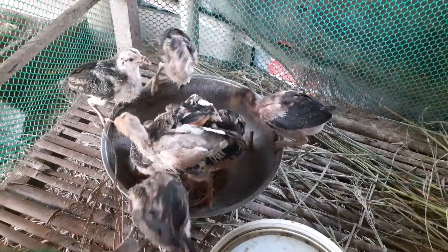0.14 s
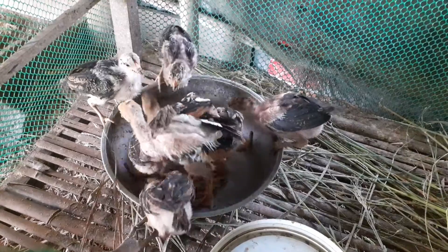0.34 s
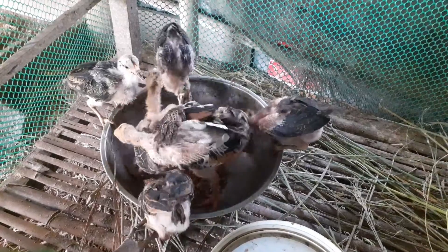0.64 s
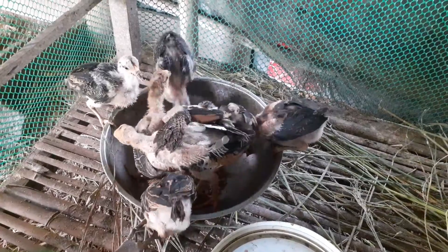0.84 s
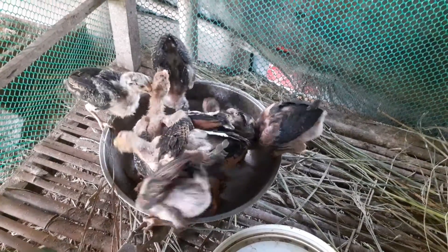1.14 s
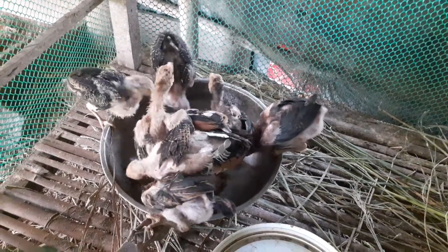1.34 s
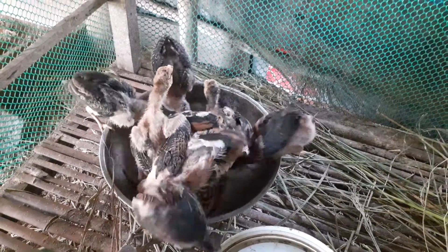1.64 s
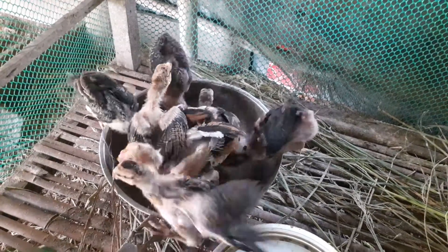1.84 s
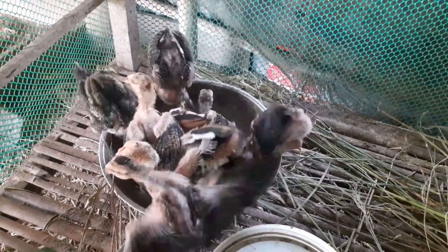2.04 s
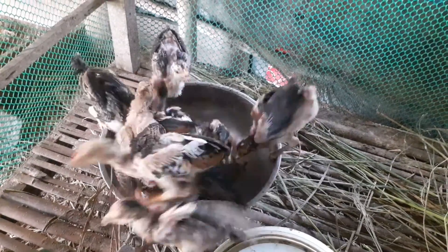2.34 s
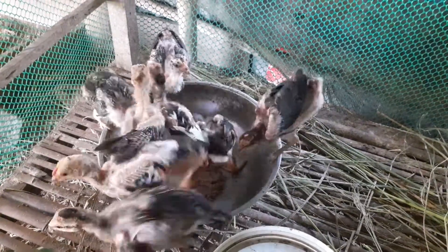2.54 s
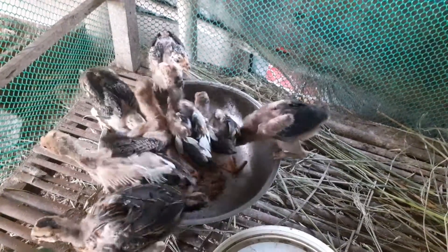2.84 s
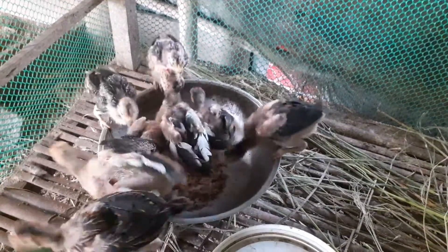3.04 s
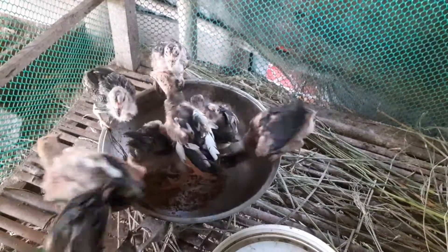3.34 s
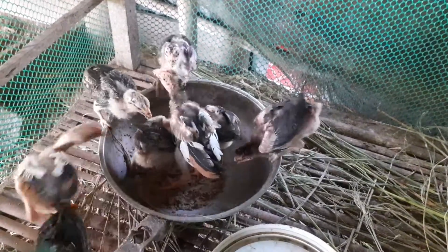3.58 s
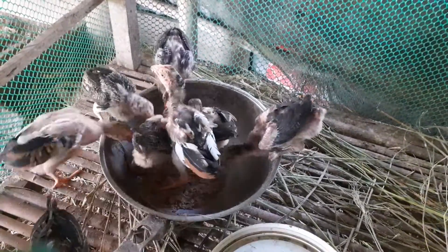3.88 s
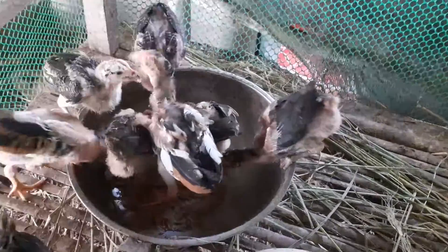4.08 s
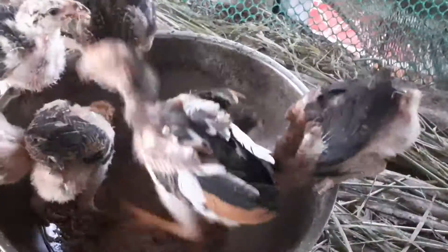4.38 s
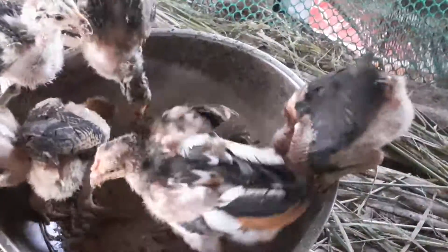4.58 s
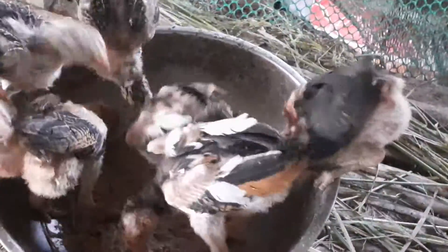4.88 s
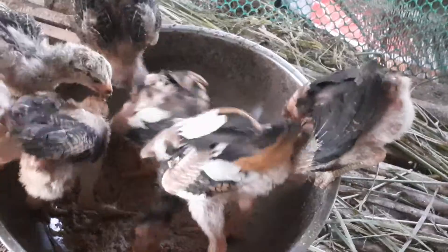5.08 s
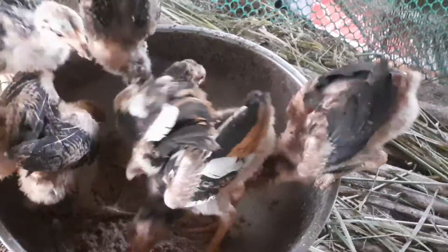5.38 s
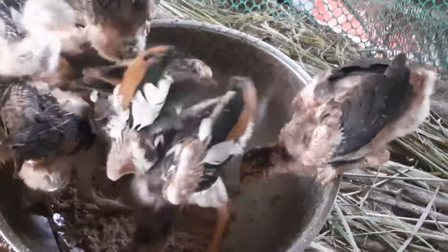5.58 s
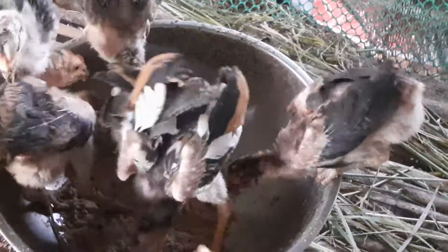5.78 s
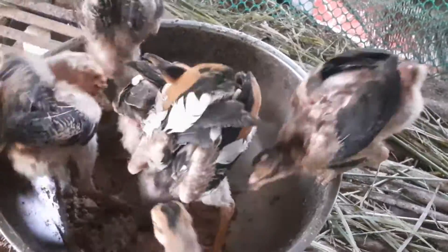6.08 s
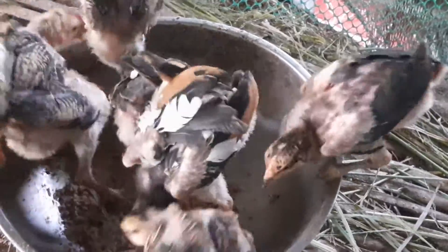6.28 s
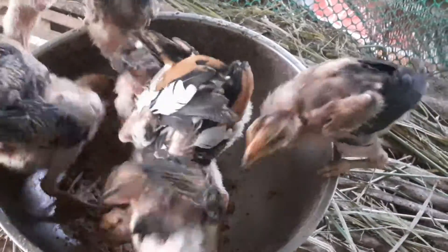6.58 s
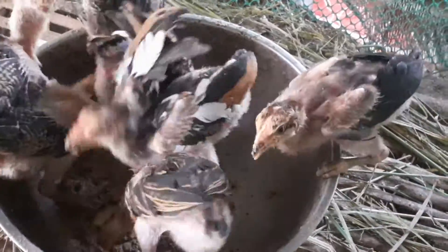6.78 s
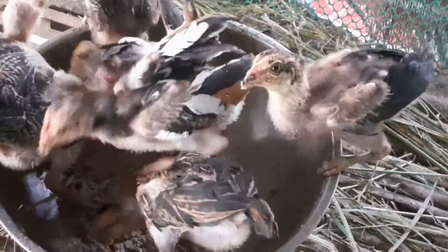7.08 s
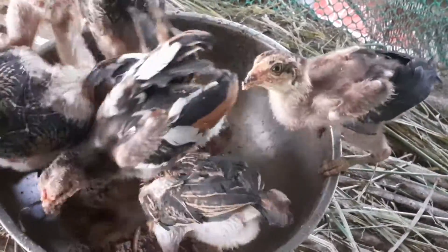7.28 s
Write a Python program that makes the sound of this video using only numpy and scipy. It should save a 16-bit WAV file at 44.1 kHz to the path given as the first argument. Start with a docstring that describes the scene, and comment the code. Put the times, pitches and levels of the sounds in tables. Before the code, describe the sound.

Young chickens feed from a metal bowl close to the microphone, in a coop with a slight, short reverberation. A clear falling peep opens, followed by softer peeps and scattered beak taps, each with a brief metallic ring. From about 2 seconds the pecks come quickly, mixed with dull thumps of feet on the bowl, shuffling, feather and straw rustle and more high peeps. The strongest thump lands at 3 seconds and the sharpest peck at about 3.4, with short claw scrapes around it. From 4 to 6 seconds the taps, knocks, light scratches and peeps continue at a looser pace. Another flurry of pecking, rustling and peeping runs from about 6.2 to 7 seconds, then settles by 7.4. Faint cheeps from other chicks and a quiet, wavering low hum continue throughout.

```python
"""Chicks at a metal feed bowl

Half-grown chicks crowd a bowl close to a two-port microphone. Beak strikes and scattered feed
ring its modes, feet thump its belly, claws scrape its wall. Peeps, near and far, are sliding
sines; feathers, straw and shuffling are patchy noise. A low hum wavers underneath, and the
coop adds a short reverberation."""
import sys
import numpy as np
from scipy import signal
from scipy.fft import rfft, irfft, next_fast_len
from scipy.io import wavfile
from scipy.ndimage import uniform_filter1d, map_coordinates

SR = 44100
rng = np.random.default_rng(int(sys.argv[2]) if len(sys.argv) > 2 else 0)


def generate_wav(signal):
    """Clip the signal to [-1, 1] and save it as 16-bit WAV at the path in sys.argv[1]."""
    frames = np.transpose(np.atleast_2d(signal))
    scaled = np.clip(frames, -1, 1) * 32767
    pcm = np.round(scaled).astype(np.int16)
    wavfile.write(sys.argv[1], SR, pcm)


N = 327222

# bowl modes: f/Hz, width/Hz, level/dB
BOWL_MODES = [(223.5, 49, -11), (362, 64, -0.5), (626, 720, -13.5), (857, 23.5, 17.5), (900, 870, -1),
              (1483, 300, 9.5), (1880, 1320, 3), (2780, 210, -2), (4370, 760, 4), (4430, 50, 8),
              (4900, 630, 2.5), (7020, 950, 7), (8230, 890, 2.5), (13100, 33000, -2)]
BELLY, WALL, UPPER_WALL, RIM, TICK = slice(0, 3), slice(3, 7), slice(4, 7), slice(7, 13), slice(13, 14)


def amp(db):
    return 10 ** (np.asarray(db) / 20)


def unit(x):
    return x / np.sqrt(np.mean(x ** 2) + 1e-20)


def along(points, hz):
    """Interpolate (f/Hz, value) points on a log axis."""
    f, v = np.transpose(points)
    return np.interp(np.log(hz + 1), np.log(f + 1), v)


def curves(rows):
    """One value per sample for each column after the time."""
    s, *cols = np.transpose(rows)
    return [np.interp(np.arange(N) / SR, s, c) for c in cols]


def wobble(rate_hz):
    """Smooth random curve, knots at rate_hz."""
    knots = rng.standard_normal(int(N * rate_hz / SR) + 4)
    return map_coordinates(knots, [np.arange(N) * rate_hz / SR])


def jitter(n, span):
    """Noise averaged over span samples, rms 1."""
    return unit(uniform_filter1d(rng.standard_normal(n), span))


def filtered(x, response):
    """Apply a complex frequency response."""
    m = next_fast_len(N + SR // 2)
    return irfft(rfft(x, m) * response(np.fft.rfftfreq(m, 1 / SR)), m)[..., :N]


def ringing(modes, hz):
    """Causal response of a set of resonances."""
    return sum((-1) ** k * amp(db) * 1j * hz * width / (f * f - hz * hz + 1j * hz * width)
               for k, (f, width, db) in enumerate(modes))


def struck_modes():
    """Bowl modes, shifted a little in pitch and strength by where the blow lands."""
    shifts = rng.standard_normal((len(BOWL_MODES), 2))
    return [(f * (1 + .03 * a), width, db + 2.5 * b)
            for (f, width, db), (a, b) in zip(BOWL_MODES, shifts)]


def add(track, start_s, sound):
    part = track[..., max(round(start_s * SR), 0):][..., :sound.shape[-1]]
    part += sound[..., :part.shape[-1]]


def patchy_noise(spectrum, coherence, patch_db, frames):
    """Stereo noise, rms 1, with time-frequency patches of random gain."""
    z = signal.stft(rng.standard_normal((2, N)), nperseg=256)[2]
    patches = uniform_filter1d(rng.standard_normal(z.shape[1:]), 14, axis=0)
    patches = unit(uniform_filter1d(patches, frames, axis=1))
    mid, side = signal.istft(z * amp(patch_db * patches), nperseg=256)[1][:, :N]
    angle = np.arccos(coherence) / 2
    pair = np.cos(angle) * mid + np.sin(angle) * side * [[1], [-1]]
    return unit(filtered(pair, lambda hz: amp(along(spectrum, hz))))


def hum():
    """Low drone: two wavering tones in rumble."""
    # tones: f/Hz, relative level/dB
    lines = [(82, -5), (111, -1.5)]
    # rumble: f/Hz, relative density/dB
    spectrum = [(22, -41), (58, -0.5), (81, 6.5), (114, 3), (152, -17), (190, -5.5), (250, -9), (420, -120)]
    tones = 0
    for hz, db in lines:
        gain = amp(db + 2.65 * wobble(9.8))
        pitch_hz = hz * (1 + 0.0412 * wobble(9.5))
        tones += gain * np.sin(2 * np.pi * np.cumsum(pitch_hz) / SR)
    return tones + patchy_noise(spectrum, coherence=0.84, patch_db=-0.5, frames=20)


def whistle(t, pitch_hz, level_db, rough, overtone_db):
    """Chick voice: a sine with weak overtones; roughness shakes pitch and level."""
    noise = rng.standard_normal((2, len(t)))
    shake = rough * unit(uniform_filter1d(uniform_filter1d(noise, 50), 50))
    phase = 2 * np.pi * np.cumsum(pitch_hz * (1 + 0.052 * shake[0])) / SR
    overtones = amp(overtone_db) * (np.sin(2 * phase) + amp(-17) * np.sin(3 * phase))
    edge = np.clip(np.minimum(t - t[0], t[-1] - t) / 0.0053, 0, 1)
    return np.sqrt(2) * amp(level_db + 5 * shake[1]) * edge * (np.sin(phase) + overtones)


def far_peeps(count):
    """The rest of the flock: short arched cheeps at random."""
    out = np.zeros(N)
    for when, pitch, fall, length, size in rng.random((count, 5)):
        t = np.arange(0, .04 + .07 * length, 1 / SR)
        arch = 1 - (0.086 + 0.382 * fall) * (t / t[-1] - .2) ** 2
        cheep = whistle(t, (2450 + 1900 * pitch ** 1.2) * arch, 5 * size, rough=.7, overtone_db=-30)
        add(out, when * N / SR, np.hanning(len(t)) * cheep)
    return unit(out)


def rustle():
    """Feathers and straw: bright, flickering noise."""
    # f/Hz, relative density/dB
    spectrum = [(710, -41), (1350, -2.5), (2030, -13), (2850, -5.5), (5450, -9.5), (7010, -6), (10200, -18),
                (15100, -19), (16000, -22)]
    return amp(wobble(45)) * patchy_noise(spectrum, coherence=0.043, patch_db=3.5, frames=5)


def shuffle():
    """Birds jostling at the bowl: low, patchy noise."""
    # f/Hz, relative density/dB
    spectrum = [(76, -18.5), (130, -2.5), (173, -11.5), (229, -18), (294, 0.5), (425, -9.5), (650, -15),
                (2200, -18), (2860, -78)]
    return patchy_noise(spectrum, coherence=0.79, patch_db=3, frames=5)


def patter(count):
    """Loose feed and claws tick on the rim at random."""
    out = np.zeros(N)
    t = np.arange(SR // 40) / SR
    for when, size, length in rng.random((count, 3)):
        level_db = -5 * np.log(size + 0.05) - 60 * t / (0.004 + 0.02 * length)
        add(out, when * N / SR, amp(level_db) * rng.standard_normal(len(t)))
    return unit(filtered(out, lambda hz: ringing(BOWL_MODES[RIM.start:], hz)))


def scrapes():
    """A claw catches, then slips in jerks that ring a hollow spot; long drags widen the resonance."""
    # claw drags on the bowl wall: t/s, length/s, f/Hz, level/dB
    drags = [(3.204, 0.1, 1315, -43.5), (3.256, 0.14, 683, -50.5), (3.44, 0.11, 1390, -42),
             (4.591, 0.034, 940, -46), (5.198, 0.23, 820, -51.5), (5.383, 0.035, 1490, -51),
             (5.457, 0.045, 1450, -52.5), (5.601, 0.085, 1570, -54), (6.615, 0.14, 930, -47.5),
             (4.143, 0.18, 1350, -50)]
    out = np.zeros(N)
    for start_s, length_s, hz, db in drags:
        t = np.arange(0, length_s + 0.11, 1 / SR)
        stroke = np.clip(t / 0.0044, 0, 1) * amp(-400 * np.clip(t - 0.36 * length_s, 0, None))
        slips = stroke * rng.standard_normal(len(t)) * amp(6 * jitter(len(t), 200))
        slips[0] += 14  # first catch
        modes = [(hz, (.05 + .8 * length_s) * hz, 0), (1.5 * hz, .8 * hz, -15)]
        spot = ringing(modes, np.fft.rfftfreq(len(t), 1 / SR))
        add(out, start_s, amp(db) * unit(irfft(rfft(slips) * spot, len(t))))
    return out


def thumps():
    """Feet and bodies push the bowl: the loaded belly booms, the wall clanks."""
    # knocks: t/s, boom peak/dB, t60/s, relative clank gain/dB
    knocks = [(0.264, -38, 0.04, -14), (0.553, -41, 0.1, -9), (0.943, -40.5, 0.042, -12),
              (1.1, -50, 0.075, -3), (1.33, -50, .05, -8), (1.44, -48, .04, -9), (1.587, -35.5, 0.059, -24),
              (1.64, -40, 0.043, -18), (1.855, -31.5, 0.036, -24), (2.029, -32.5, 0.13, -7),
              (2.111, -31.5, 0.066, -14), (2.162, -23.5, 0.022, -9), (2.332, -37, 0.08, -16),
              (2.357, -30, 0.13, -17), (2.425, -27, 0.041, -26), (2.475, -24.5, 0.025, -26),
              (2.664, -27, 0.07, -7.5), (2.996, -16, 0.026, -13), (3.211, -38, 0.045, -7),
              (3.393, -25.5, 0.02, -3), (3.402, -29, 0.059, 2), (3.46, -31.5, 0.08, -13),
              (3.592, -34, 0.074, -18), (4.014, -29, 0.072, -31), (4.124, -36, 0.084, -10),
              (4.283, -36, 0.027, -17), (4.373, -36.5, 0.052, -11), (4.505, -34, 0.053, -7),
              (4.94, -31.5, 0.043, -17), (4.965, -35, 0.014, -29), (5.05, -42, 0.015, -10),
              (5.255, -29, 0.05, -22), (5.384, -33.5, 0.077, -31), (5.461, -38, 0.1, -25),
              (5.56, -39, 0.12, -7.5), (5.984, -36.5, 0.012, -7), (6.111, -40, 0.056, -5),
              (6.284, -28.5, 0.025, -6.5), (6.34, -38.5, 0.041, 2), (6.419, -35.5, 0.041, -35),
              (6.484, -42.5, 0.057, -31), (6.52, -38.5, .05, -29), (6.626, -36, 0.089, -12),
              (6.7, -37, 0.066, -15), (6.914, -38.5, 0.035, -10), (7.061, -35, 0.044, -17)]
    # belly pitch as the birds' weight shifts: t/s, f/Hz
    load = [(0.0, 337.5), (4.95, 340.4), (5.25, 287), (6.0, 304), (7.42, 342)]
    out = np.zeros(N)
    t = np.arange(SR // 4) / SR
    hz = np.fft.rfftfreq(len(t), 1 / SR)
    belly_hz, = curves(load)
    main_hz, main_width_hz, _ = BOWL_MODES[1]
    for start_s, db, t60_s, clank_db in knocks:
        push = 0.014 * amp(-60 * t / 0.12) * rng.standard_normal((2, len(t)))  # shudder
        push[:, 0] += rng.choice([-1, 1])  # impact
        shift = belly_hz[round(start_s * SR)] / main_hz
        damping = np.log(1000) / (np.pi * t60_s * main_width_hz)
        loaded = [(f * shift, width * damping, level) for f, width, level in BOWL_MODES[BELLY]]
        belly = ringing(loaded, hz) / (1 + 1j * hz / 450) ** 2
        wall = ringing(struck_modes()[WALL], hz) / (1 + 1j * hz / 1500) ** 2
        boom, clank = irfft(rfft(push) * [belly, wall], len(t))
        add(out, start_s, amp(db) * (boom / abs(boom).max() + amp(clank_db + 31) * clank))
    return out


def near_peeps():
    """Each call flicks up, then slides down; it swells and fades more quickly."""
    # t at top/s, slide/s, top f/Hz, end f/Hz, bend (>1 drops early), level/dB, roughness, overtone/dB
    calls = [(.088, 0.092, 4370, 2866, 1.1, -37, 0.27, -19.5),
             (.455, 0.038, 3650, 2680, 0.36, -48.5, 0.66, -32),
             (.555, 0.11, 4140, 3620, 0.72, -52, 0.17, -30),
             (0.759, 0.14, 4080, 3640, 0.72, -62, 0.53, -30), (1.36, 0.035, 3970, 2870, 0.8, -53, 0.4, -30),
             (2.243, 0.036, 3230, 1827, 3, -32.5, 0.55, -8), (2.25, 0.021, 3900, 3710, 0.82, -40, .4, -30),
             (2.375, 0.029, 2876, 2580, 0.64, -35.5, 0.38, -30),
             (2.56, 0.08, 3855, 2305, 1.03, -36, 0.48, -35),
             (2.83, 0.054, 2910, 2440, 1.23, -47.5, 0.43, -16),
             (3.045, 0.069, 3498, 3150, 0.24, -33, 0.2, -40),
             (3.075, 0.075, 4134, 2543, 2.4, -34, 0.34, -44),
             (3.258, 0.084, 3780, 2404, 2.25, -39.5, 0.49, -14.5),
             (3.832, 0.078, 3640, 2860, 0.92, -34.5, 0.04, -13),
             (4.145, 0.047, 3920, 3890, 0.77, -37.5, 0.82, -14),
             (4.25, 0.029, 3590, 3070, 0.46, -47, 0.2, -11),
             (4.592, 0.036, 3540, 2890, 0.46, -45.5, 0.25, -30),
             (4.765, 0.043, 3540, 2980, 0.6, -47, 0.094, -10),
             (4.965, 0.066, 3590, 3450, 0.76, -43.5, 0.99, -18),
             (6.26, 0.056, 2676, 2400, 2.5, -44.5, 0.3, -50),
             (6.425, 0.071, 3300, 2890, 1.5, -49.5, 0.67, -17),
             (6.605, 0.04, 3270, 3177, 1.03, -44.5, 0.26, -30),
             (6.755, 0.073, 3272, 2863, 0.29, -35.5, 0.36, -21),
             (6.735, .025, 3800, 3350, 1.4, -39, 0.33, -28),
             (6.97, 0.043, 4510, 2500, 0.72, -38.5, 0.22, -27)]
    flick_s, kink_s = 0.017, 0.011
    crest, swell_db, fade_db = 0.71, 8.5, 15.5  # crest: loudest point, as share of the slide
    out = np.zeros(N)
    for top_s, slide_s, top_hz, end_hz, bend, db, rough, overtone_db in calls:
        t = np.arange(-flick_s, slide_s, 1 / SR)
        knots = np.arange(-flick_s, slide_s + kink_s, kink_s)
        kinks = 0.056 * np.interp(t, knots, rng.standard_normal(len(knots)))  # stalls and hurries
        progress = t / slide_s
        slide_hz = end_hz + (top_hz - end_hz) * np.clip(1 - progress - kinks, 0, 1) ** bend
        pitch_hz = slide_hz * np.interp(t, [-flick_s, 0], [.85, 1])
        curvature_db = np.where(progress < crest, swell_db / crest ** 2, fade_db / (1 - crest) ** 2)
        level_db = db - curvature_db * (progress - crest) ** 2
        add(out, top_s - flick_s, whistle(t, pitch_hz, level_db, rough, overtone_db))
    return out


def pecks():
    """A beak cracks on the bowl and feed rattles on, driving the rim, wall and top tick modes."""
    # strikes: t/s, rim drive/dB, wall re rim/dB, tick re rim/dB, t60/s
    strikes = [(0.4278, -33.5, -3, -30, 0.056), (0.5272, -41, -10, -9, 0.14), (0.948, -39.5, 3, -28, 0.044),
               (1.081, -47, 0.5, -21, 0.21), (1.1893, -48, -22, 0, 0.21), (1.5743, -42.5, -27, 5, 0.18),
               (1.75, -36, 8, -24, 0.047), (1.848, -44.5, -16, -14, 0.21), (2.0329, -30, 2, -19, 0.083),
               (2.096, -34.5, 7, -29, 0.14), (2.165, -31.5, 12.5, -9, 0.023), (2.206, -34.5, 9, -6, 0.066),
               (2.221, -33, -8, -7, 0.16), (2.3397, -38, 14, -4, 0.1), (2.4257, -40, 3, -6, 0.084),
               (2.4785, -37.5, 6, -16, 0.22), (2.647, -32, 2.5, -4, 0.19), (2.662, -28.5, -2.5, -12, 0.081),
               (2.9485, -34.5, 4.5, -11, 0.076), (2.9962, -27.5, 5.5, -23, 0.097),
               (3.3926, -17.5, -3, -5, 0.12), (3.482, -41.5, 4, 4, 0.063), (3.5763, -51.5, 20, 3, 0.23),
               (4.0313, -36.5, 5, -27, 0.037), (4.284, -35, -1, -25, 0.058), (4.379, -48, 10, -6, 0.063),
               (4.503, -33, -3, -5.5, 0.084), (4.913, -47.5, 11.5, -21, 0.13),
               (4.953, -41, 10.5, -30, 0.11), (5.2507, -30.5, 9.5, -29, 0.093), (5.5221, -36, 1, -5, 0.076),
               (5.725, -35, -3.5, -9, 0.04), (5.9338, -47, 15.5, -22, 0.028), (5.9862, -35, -1, -40, 0.07),
               (6.0136, -33.5, -30, -0.5, 0.059), (6.2877, -38.5, 13, -22, 0.06),
               (6.5027, -34.5, -29, -3.5, 0.08), (6.6016, -35, -9, -7, 0.17),
               (6.6506, -40.5, -6, -4, 0.087), (6.7196, -31, -10, -1, 0.048),
               (6.8368, -35.5, -32, -8, 0.026), (6.918, -36.5, -3, -33, 0.047)]
    out = np.zeros((2, N))
    t = np.arange(SR // 5) / SR
    hz = np.fft.rfftfreq(len(t), 1 / SR)
    settle = amp(-32 - 60 * t / .2)
    rim_rolloff = (1 - (hz / 8800) ** 2 + 1j * hz / 8800) ** 2
    for start_s, db, wall_db, tick_db, t60_s in strikes:
        rattle = amp(3 * np.clip(t / .03, 0, 1) * jitter(len(t), 90))
        # short, hard strikes crack most and rise fastest
        crack = 0.096 / t60_s * amp(-60 * t / 0.0038)
        rise = 1 - np.exp(-t / (0.00034 + 0.068 * t60_s ** 2))
        envelope = rise * (crack + amp(-60 * t / t60_s) + settle)
        drive = envelope * unit(rattle * rng.standard_normal((3, len(t))))
        drive *= amp(db + np.array([[0], [wall_db], [tick_db]]))
        modes = struck_modes()
        rim, wall, tick = [ringing(modes[part], hz) for part in (RIM, UPPER_WALL, TICK)]
        rim /= rim_rolloff
        rim = unit(abs(rim)) * np.exp(1j * np.angle(rim))  # colour varies, strength stays
        place = rng.normal()  # spot on the bowl: shifts level and arrival between ports
        scatter = 0.94 * rng.standard_normal(drive.shape) * abs(drive)  # grains differ at the far port
        regions = rfft([drive, drive + scatter]) * [rim, wall, tick]
        left, right = irfft(regions.sum(axis=1), len(t))
        add(out[0], start_s - .0006, amp(.5 * place) * left)
        add(out[1], start_s - .0006 + .00012 * place, amp(-.5 * place) * right)
    return out


def coop(x):
    """Walls and netting reverberate: one noise tail per port, treble dying first."""
    # decay: f/Hz, t60/s
    decay = [(200, 0.41), (2000, 0.19), (7000, 0.067), (14000, 0.0028)]
    hz, t, z = signal.stft(rng.standard_normal((2, SR // 2)), SR, nperseg=256)
    tail = signal.istft(z * amp(-60 * t / along(decay, hz)[:, None]), SR, nperseg=256)[1]
    delayed = np.pad(x, (200, 0))[None]
    return signal.fftconvolve(delayed, tail / np.linalg.norm(tail[0]), axes=1)[:, :N]


def ports(pair):
    """Level and arrival time differ between the two ports."""
    # balance: f/Hz, left re right/dB
    tilt = [(60, -4), (180, -3.7), (550, -3.5), (1650, -1.5), (4970, -6), (9000, -1.5), (15000, -1)]
    # left port hears first: f/Hz, lead/s
    lead = [(300, 0.000041), (800, 0.00017), (1500, 0.00038), (9000, 0.00039)]
    half = np.array([[.5], [-.5]])
    return filtered(pair, lambda hz: amp(half * along(tilt, hz))
                    * np.exp(2j * np.pi * hz * half * along(lead, hz)))


def scene():
    """Near sources through the ports, plus reverberation; far peeps are reverberation only."""
    # flock jostling: t/s, rustle/dB, shuffle/dB
    stir = [(0.0, -62.5, -68), (1.55, -64.5, -63.5), (2.29, -51, -44.5), (2.75, -51.5, -50),
            (3.39, -52.5, -48.5), (3.76, -58.5, -55), (5.13, -58, -57), (5.46, -59, -52),
            (5.7, -59.5, -60.5), (6.22, -51.5, -56), (6.55, -57.5, -53.5), (6.74, -55, -55),
            (7.42, -63.5, -67)]
    # background: t/s, hum/dB, far peeps/dB
    yard = [(0.0, -61.5, -56), (1.51, -68, -61.5), (2.37, -63.5, -56.5), (3.3, -55, -59.5),
            (4.2, -56.5, -57.5), (5.7, -61, -61), (7.0, -57.5, -60), (7.42, -58, -67)]
    rustle_db, shuffle_db = curves(stir)
    hum_db, far_db = curves(yard)
    bustle = wobble(11)  # bursts of movement and lulls
    beaks, knocks, calls = pecks(), thumps() + scrapes(), near_peeps()
    far = amp(far_db) * far_peeps(count=190)
    near = beaks + knocks + calls
    near += amp(rustle_db + 2 * bustle) * rustle()
    near += amp(rustle_db - 10) * patter(count=500)
    near += amp(shuffle_db + 3 * bustle) * shuffle()
    near += amp(hum_db) * hum()
    wet = amp(-9) * coop(beaks.mean(axis=0) + amp(-11) * knocks)
    wet += coop(amp(-9.5) * calls + amp(-3) * far)
    return ports(near) + wet


def record(dry):
    """Microphone: a dip near 10 kHz, a fading top, a hard band limit."""
    def response(hz):
        dip_db = 8 * np.exp(-((hz - 10200) / 1100) ** 2)
        top_loss_db = 20 * (hz > 15950) + 0.038 * np.clip(hz - 16200, 0, None)
        return amp(-dip_db - top_loss_db) * (hz < 16800)
    return filtered(dry, response)


dry = scene()
out = record(dry)
generate_wav(out)
```